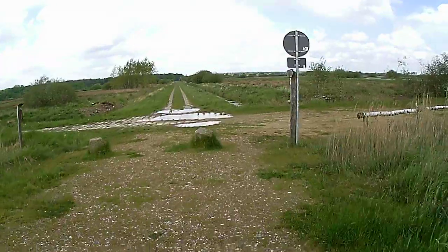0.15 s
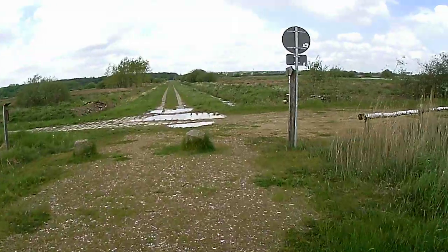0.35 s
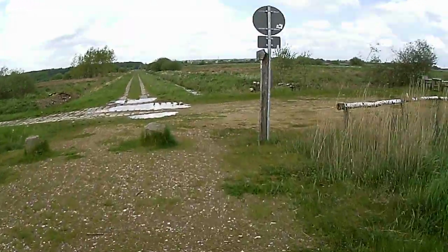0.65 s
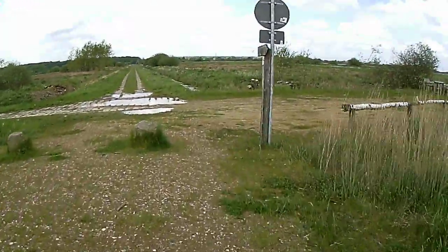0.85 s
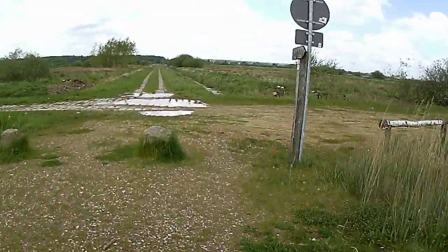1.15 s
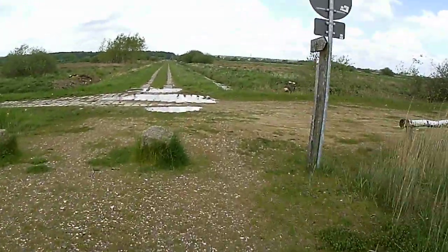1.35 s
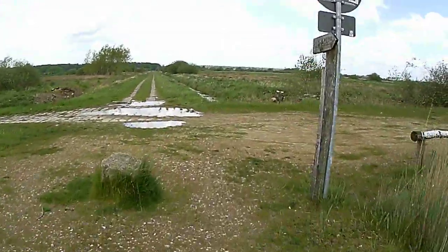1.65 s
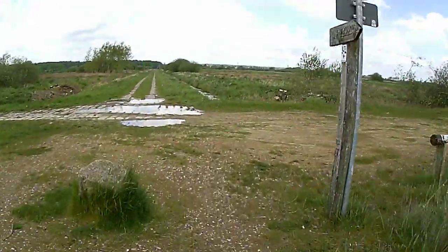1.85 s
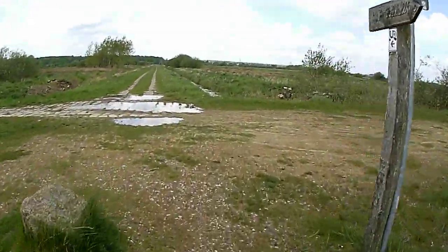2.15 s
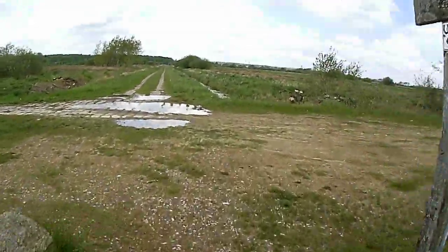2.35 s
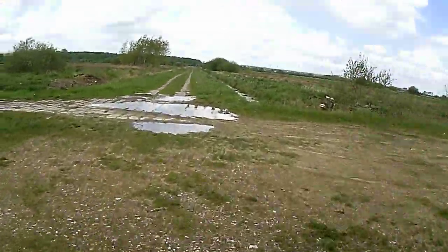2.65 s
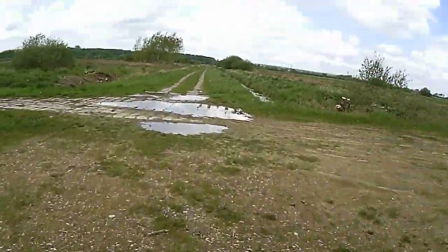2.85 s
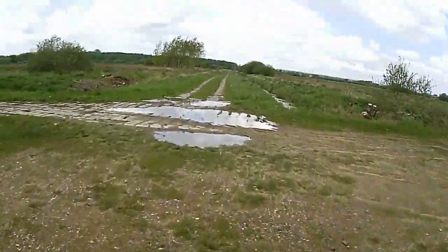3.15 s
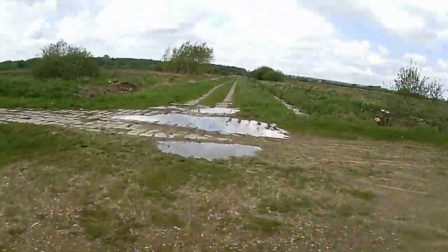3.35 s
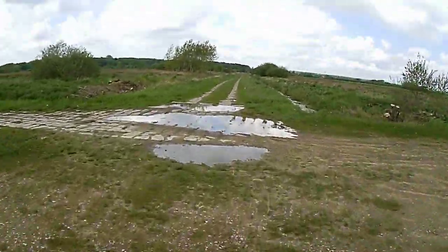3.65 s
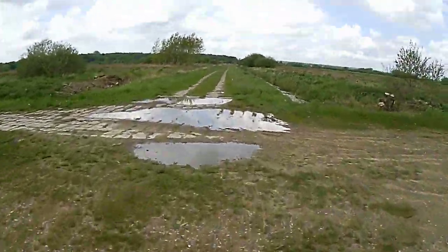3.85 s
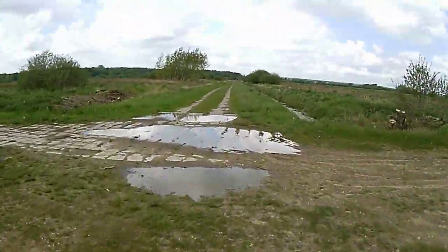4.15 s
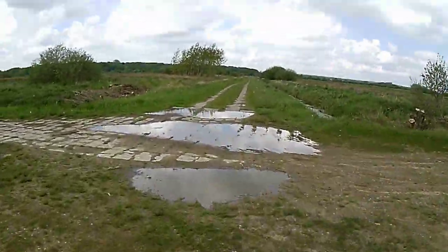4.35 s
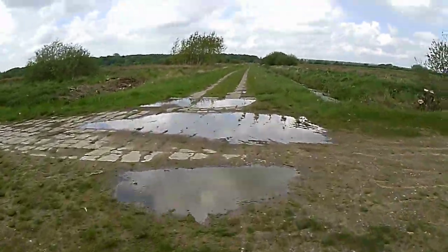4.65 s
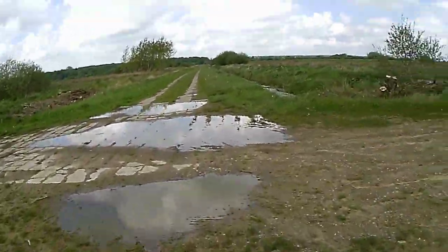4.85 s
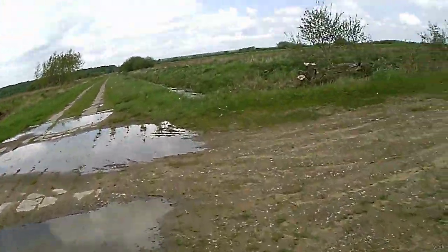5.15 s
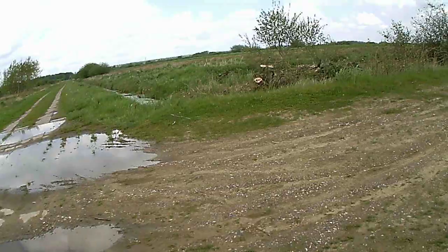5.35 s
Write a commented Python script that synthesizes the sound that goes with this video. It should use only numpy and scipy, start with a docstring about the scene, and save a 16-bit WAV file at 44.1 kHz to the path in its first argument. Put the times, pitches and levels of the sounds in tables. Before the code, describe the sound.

Close on a handlebar, gravel crunch and low mount rumble give way to stuttering brake squeals near 1 kHz, with plastic rattling and wind.

```python
"""A bicycle brake squeals near 1 kHz, close to a camera on the handlebar, as the bicycle rolls over gravel.
The sticking and slipping pad sings a wavering tone with overtones, in short grips from the start of the
braking, with one longer squeal near 2.5 s. Rough ground makes the camera mount boom at a low resonance, and
its loose case rattles in short modes. Tyres crunch as filtered grains, the freewheel ticks early on in bright
bursts of noise, and lumpy low noise is wind on the microphone, over the camera's own hiss and faint whine."""
import sys
import numpy as np
from scipy import signal
from scipy.fft import rfft, irfft, next_fast_len
from scipy.io import wavfile
from scipy.ndimage import uniform_filter1d

SR = 44100
rng = np.random.default_rng(int(sys.argv[2]) if len(sys.argv) > 2 else 0)


def output_pcm(signal):
    """Save a mono or channel-first signal as 16-bit PCM at the path in sys.argv[1].

    Samples are clipped to [-1, 1] before scaling.
    """
    pcm = np.clip(np.atleast_2d(signal).T, -1, 1) * 32767
    wavfile.write(sys.argv[1], SR, np.round(pcm).astype(np.int16))


N = 242991
T = np.arange(N) / SR  # seconds

# Rough ground under the bicycle, shaking the mount and making the case chatter.
# Each row: start in seconds, end in seconds, relative shake level in dB, relative chatter level in dB.
ROUGH_PATCHES = [(0.024, 0.109, -18, -40), (0.276, 0.352, -18, -42.5), (0.435, 0.472, -17, -46),
                 (0.565, 0.654, -22.5, -42), (0.698, 0.757, -16.5, -42), (0.847, 1.082, -21, -48),
                 (1.147, 1.3, -21.5, -58), (1.396, 1.481, -19.5, -56), (1.736, 1.82, -21.5, -16.5),
                 (2.019, 2.032, -18, -15), (2.152, 2.225, -21.5, -11), (2.227, 2.341, -19.5, -8.5),
                 (2.851, 2.985, -24.5, -17), (3.194, 3.289, -26, -23), (3.319, 3.479, -24.5, -15),
                 (3.591, 3.64, -21, -20.5), (3.73, 3.794, -20, -19), (3.819, 3.94, -22.5, -24.5),
                 (4.25, 4.268, -19, -11.5), (4.303, 4.403, -20.5, -20.5), (4.505, 4.543, -30, -25.5),
                 (4.669, 4.804, -25, -28.5), (4.854, 4.954, -20.5, -17.5), (5.04, 5.21, -26.5, -60),
                 (5.321, 5.407, -22, -21), (5.428, 5.473, -21, -30)]
SMOOTH_GROUND_DB, SHAKE_RISE_DB_PER_S, SHAKE_FALL_DB_PER_S = -29.5, 377, 299
# Rumble of the camera mount. Each row: frequency in Hz, relative spectrum level in dB per Hz.
MOUNT_RUMBLE = [(8.8, -38), (15, -11), (32, -5.5), (49, 5.5), (65, -25.5), (78, 6), (108, -3.5), (130, -23),
                (170, -56.5), (290, -120)]
# Higher resonances of the handlebar. Each row: centre in Hz, width in Hz, level against the shaking in dB.
HANDLEBAR_MODES = [(196.4, 19, -20.5), (293, 10, -28)]

# Tyres on gravel, before clumping. Each row: time in seconds, level in dB.
ROLL_LEVEL = [(0, -41), (.45, -47), (1.3, -40.5), (2.3, -33), (3.1, -50), (4, -43), (5.51, -48)]
# Colour of the gravel. Each row: frequency in Hz, relative spectrum level in dB per Hz.
GRAVEL_COLOUR = [(200, 5.5), (500, 11.5), (850, 9.5), (1300, 2), (1750, 6), (2200, -4.5), (3100, -0.5),
                 (3900, -16), (5000, -12.5), (7000, -17), (9000, -31.5), (16000, -19)]
# Single stones popping from under the tyre. Each row: time in seconds, relative level in dB, ring in Hz.
STONE_POPS = [(0.7735, -21.5, 1270), (0.836, -31, 1940), (0.8905, -30, 2090), (0.9035, -31, 1850),
              (0.975, -21.5, 1960), (0.992, -15.5, 1260), (1.1953, -21.5, 1580)]
# Bumps thudding through the frame. Each row: time in seconds, relative level in dB.
FRAME_BUMPS = [(0.549, -21.5), (0.773, -20), (0.989, -24), (1.193, -24)]

# Wind on the microphone. Each row: time in seconds, level in dB.
GUST_LEVEL = [(0, -51), (.75, -39.5), (1.5, -45), (2.3, -38.5), (3.2, -42), (3.55, -33.5), (3.8, -33.5),
              (3.95, -27.5), (4.14, -40), (4.6, -42.5), (4.95, -35.5), (5.08, -27.5), (5.2, -25),
              (5.35, -28.5), (5.51, -37.5)]
# Colour of wind and of bumps. Each row: frequency in Hz, relative spectrum level in dB per Hz.
LOW_COLOUR = [(60, -32.5), (135, 6), (200, 0.5), (280, 1.5), (420, -5.5), (700, -10), (1100, -19),
              (2000, -27), (5000, -57)]
# Faint thin whine in the treble. Each row: centre in Hz, width in Hz, level in dB.
WHINE_BANDS = [(8260, 150, -74.5), (9280, 140, -70.5)]

# Single knocks of the loose camera case, strong and light. Each row: time in seconds, peak in dB.
SINGLE_KNOCKS = [(1.485, -9), (1.518, -18), (1.59, -14), (1.684, -15), (1.768, -12), (1.784, -7),
                 (1.811, -12), (2.02, -15), (2.11, -13), (2.363, -11), (2.418, -10), (2.709, -8),
                 (2.862, -10), (2.927, -14), (3.412, -9), (3.47, -13), (3.774, -13), (3.874, -14),
                 (4.267, -6), (4.387, -9), (4.686, -19), (4.851, -11), (4.883, -10), (5.163, -23),
                 (5.325, -12), (5.388, -14)]
# Modes of the case, before scatter. Each row: frequency in Hz, relative level in dB, 60 dB decay in seconds.
CASE_MODES = [(420, -8.5, 0.0058), (1754, -8, 0.013), (2580, -12.5, 0.017), (3310, -1, 0.014),
              (3460, 9, 0.013), (4030, -9, 0.031), (4860, 6.5, 0.008), (5065, -1, 0.019),
              (5850, -7.5, 0.013), (6230, -6.5, 0.015), (7680, -5, 0.0093), (10200, -12.5, 0.0065),
              (12200, -22, .005)]
# Dry crack of a blow on the case. Each row: frequency in Hz, relative spectrum level in dB per Hz.
CRACK_COLOUR = [(300, 4), (800, 1.5), (2300, 9.5), (3500, 6), (8000, -7), (10000, -16), (16000, -19)]
SQUEAL_CHATTER_DB, FULL_GRIP_DB = -17.5, -6  # a squeal at full grip shakes the case too
CHATTER_RISE_DB_PER_S, CHATTER_FALL_DB_PER_S = 1798.5, 1102

# Freewheel pawl. Each row: time in seconds, relative level in dB.
PAWL_TICKS = [(0.1593, -23), (0.2658, -19.5), (0.5495, -21), (0.7845, -21), (0.818, -21.5), (0.854, -18.5),
              (0.9134, -22.5), (0.9999, -17.5), (1.0584, -24.5), (1.123, -27.5), (1.1475, -25), (1.19, -26),
              (1.266, -33.5)]
# Colour of a tick. Each row: frequency in Hz, relative spectrum level in dB per Hz.
PAWL_COLOUR = [(500, -3), (1500, 4.5), (3000, -6), (5000, -3.5), (7000, -1), (8300, -11), (9700, -0.5),
               (11000, -6.5), (12600, -4), (14000, -17), (16000, -9.5)]

# The pad dragging on the wheel. Each row: time in seconds, relative level in dB.
DRAG_LEVEL = [(1.1, -71), (1.3, -47.5), (1.8, -35), (2.8, -39), (3.2, -38.5), (4.6, -39.5), (5.1, -42.5),
              (5.51, -43)]
# Resonances that the dragging wakes. Each row: centre in Hz, width in Hz, relative level in dB.
WHEEL_MODES = [(985, 162, 7.5), (1670, 170, 0), (1932, 47, -4), (2465, 140, -5), (3144, 67, -9.5),
               (3100, 110, -25), (4500, 240, -24), (9400, 250, -24.5), (10600, 230, -29)]

# Faint song of the pad between grips. Each row: time in seconds, relative level in dB, pitch in Hz.
LIGHT_TOUCH = [(1.431, -44.5, 1130), (1.5, -21, 1116), (1.95, -22, 1095), (2.3, -26, 1067),
               (2.8, -30.5, 1043), (3.1, -23, 1055), (3.73, -37.5, 1045), (4.0, -30.5, 1045),
               (4.38, -34, 1045), (4.87, -26.5, 1050), (5.0, -37.5, 1060), (5.25, -45, 1055)]
# One squeal for each grip of the pad.
# Each row: start in seconds, end in seconds, relative level in dB, swell over its length in dB, pitch in Hz.
SQUEAL_GRIPS = [(1.467, 1.482, -3.5, -4.5, 1022), (1.535, 1.561, -11.5, -2, 1103),
                (1.574, 1.648, -4.5, -1, 1006), (1.677, 1.695, -10.5, -0.5, 1053),
                (1.713, 1.728, -9, -0.5, 1018), (1.751, 1.768, -8.5, -3.5, 1067),
                (1.794, 1.924, -5, 2, 1000), (1.998, 2, -12, 0.5, 1080), (2.036, 2.111, -5.5, 2, 1002),
                (2.147, 2.205, -8, -4, 1003), (2.346, 2.717, -6, 1.5, 994.4),
                (2.854, 3.032, -7.5, -2, 992.5), (3.204, 3.247, -8, -2.5, 1003),
                (3.262, 3.423, -14.5, 7.5, 1008), (3.468, 3.557, -15.5, 8.5, 1029),
                (3.609, 3.629, -13, -1, 1018), (3.825, 3.885, -7, 0.5, 1013), (3.904, 3.936, -17, 2, 999),
                (4.031, 4.045, -13, -14.5, 1026), (4.105, 4.11, -14, 0, 1046),
                (4.139, 4.195, -5, -12, 1016), (4.435, 4.49, -7, -4, 1019),
                (4.521, 4.572, -10.5, -10.5, 1033), (4.743, 4.799, -6.5, -5.5, 1012),
                (5.023, 5.035, -21, -2, 1071), (5.114, 5.168, -24.5, 7.5, 1039)]
ATTACK_DB_PER_S, RELEASE_DB_PER_S = 1400.5, 559.5
SLACK_HZ = 55.27  # the pitch rises towards this much higher while the pad takes hold or lets go
# Judders of the pad: the pitch shifts and a lower mode grows.
# Each row: centre in seconds, half length in seconds, added share of the lower mode, downward shift in Hz.
PAD_JUDDERS = [(1.646, 0.033, 0.16, 12), (1.914, 0.02, .51, 70.5), (2.084, 0.016, 0.098, 65.5),
               (2.434, 0.038, 0.1, -1.5), (2.568, 0.065, 0.044, 0.5), (2.739, 0.031, 0.52, 28)]
# Overtones of the squeal. Each row: multiple of the pitch, relative level at full grip in dB.
SQUEAL_OVERTONES = [(2, -19.5), (3, -22.5), (4, -34.5), (5, -34), (6, -42), (7, -48)]
# Hiss of the rubbing pad. Each row: frequency in Hz, relative spectrum level in dB per Hz.
RUB_COLOUR = [(200, -42.5), (600, -4), (1400, -37), (2500, -7), (3450, 18.5), (4300, 14.5), (5100, 19.5),
              (5500, -12.5), (7800, -0.5), (11000, -5.5), (16000, -23)]


def amp(db):
    """Decibels to gain."""
    return 10 ** (np.asarray(db) / 20)


def evened(x):
    """Scales to an rms of one."""
    return x / np.sqrt(np.mean(abs(x) ** 2) + 1e-20)


def curve(rows):
    """Joins (seconds, value) rows by straight lines."""
    s, value = np.transpose(rows)
    return np.interp(T, s, value)


def colour(x, points):
    """Shapes the spectrum of x by (Hz, dB) points, at an rms of one."""
    hz, db = np.transpose(points)
    f = np.fft.rfftfreq(len(x), 1 / SR)
    gain = amp(np.interp(np.log(f + 1), np.log(hz), db))
    return evened(irfft(rfft(x) * gain, len(x)))


def noise():
    """White noise."""
    return rng.standard_normal(N)


def drift(rate_hz):
    """Smooth chance, at an rms of one, that changes up to about this rate."""
    size = next_fast_len(N)
    f = np.fft.rfftfreq(size, 1 / SR)
    slow = rfft(noise(), size) * np.exp(-(f / rate_hz) ** 2)
    return evened(irfft(slow, size)[:N])


def bands(rows):
    """Noise in narrow resonances: (centre Hz, width Hz, rms dB)."""
    f = np.fft.rfftfreq(N, 1 / SR)
    power = 0
    for hz, width, db in rows:
        shape = 1 / (1 + ((f - hz) / width) ** 2) ** 2
        power = power + amp(2 * db) * SR / (np.pi * width) * shape
    return irfft(rfft(noise()) * np.sqrt(power), N)


def add(mix, s, sound):
    """Mixes a short sound in at time s."""
    part = mix[max(round(s * SR), 0):][:len(sound)]
    part += sound[:len(part)]


def edges(start, end, rise_db_per_s, fall_db_per_s):
    """Attack, hold and release, as dB relative to the held level."""
    before, after = np.maximum(start - T, 0), np.maximum(T - end, 0)
    return -abs(rise_db_per_s) * before - abs(fall_db_per_s) * after


def thump(t, peak_s):
    """Envelope of a light blow: it reaches one at peak_s, then dies away."""
    return t / peak_s * np.exp(1 - t / peak_s)


def shaking(uneven_db=1.85):
    """Level (dB) of the mount's shaking: it builds to each rough patch and rings down after it."""
    level_db = np.full(N, SMOOTH_GROUND_DB)
    for start, end, db, _ in ROUGH_PATCHES:
        patch_db = db + edges(start, end, SHAKE_RISE_DB_PER_S, SHAKE_FALL_DB_PER_S)
        level_db = np.maximum(level_db, patch_db)
    return level_db + uneven_db * drift(31)


def mount(shake_db, ring_hz=67, wander_hz=4, ring_db=-1, rumble_db=-8):
    """The camera sways on its mount at one low resonance, over a rumble; also returns the sway phase."""
    sway = 2 * np.pi * np.cumsum(ring_hz + wander_hz * drift(18)) / SR
    ring = amp(ring_db + shake_db) * np.sqrt(2) * np.sin(sway)
    rumble = colour(noise(), MOUNT_RUMBLE) * amp(rumble_db) + bands(HANDLEBAR_MODES)
    smoothed_db = uniform_filter1d(shake_db, SR // 3)  # the rumble follows the shaking slowly
    return ring + amp(smoothed_db) * rumble, sway


def tyres(grains_per_s=1300, grain_db=4.5, clump_db=2, stone_db=-2, stone_s=0.0028, bump_db=-9, bump_s=0.0088):
    """Countless small stones grind under the tyres; a few pop out or jolt the frame."""
    struck = rng.random(N) < grains_per_s / SR
    size_db = grain_db * np.minimum(rng.exponential(1, N), 4)
    grains = struck * noise() * amp(size_db)
    out = amp(curve(ROLL_LEVEL) + clump_db * drift(6.7)) * colour(grains, GRAVEL_COLOUR)
    t = np.arange(2048) / SR
    for s, db, hz in STONE_POPS:
        grit = colour(rng.standard_normal(len(t)), GRAVEL_COLOUR)
        pop = 0.3 * np.sin(2 * np.pi * hz * t) + 0.47 * grit
        add(out, s, amp(db + stone_db) * thump(t, stone_s) * pop)
    for s, db in FRAME_BUMPS:
        thud = colour(rng.standard_normal(len(t)), LOW_COLOUR)
        add(out, s, amp(db + bump_db) * thump(t, bump_s) * thud)
    return out


def wind(lumps_db=1):
    """Lumpy low turbulence at the microphone port."""
    turbulence = noise() * amp(lumps_db * drift(53))
    return amp(curve(GUST_LEVEL)) * colour(turbulence, LOW_COLOUR)


def camera(hiss_db=-61):
    """Hiss of the electronics behind the microphone, with a faint whine."""
    hiss_colour = [(1000, 23.5), (5000, -5), (8000, 8.5), (12000, -14.5), (16000, -5.5)]  # (Hz, dB per Hz)
    return bands(WHINE_BANDS) + amp(hiss_db) * colour(noise(), hiss_colour)


def case_knock(treble_db, crack_db=-7, crack_s=0.002, scatter_db=3):
    """One blow on the plastic case, peak one: a crack and its short modes."""
    t = np.arange(1024) / SR
    hz, db, t60 = np.transpose(CASE_MODES)[:, :, None]
    chance = rng.standard_normal((3, len(CASE_MODES), 1))  # for level, pitch and phase of each mode
    tilt = np.clip(2 * np.log2(hz / 3500), 0, 1)  # full from half an octave above 3500 Hz
    db = db + scatter_db * chance[0] + treble_db * tilt
    cycles = np.sin(2 * np.pi * hz * (1 + 0.026 * chance[1]) * t + chance[2])
    ring = (amp(db - 60 * t / t60) * cycles).sum(0)
    crack = colour(rng.standard_normal(len(t)), CRACK_COLOUR) * np.exp(-t / crack_s)
    onset = 1 - np.exp(-t / 0.000052)
    blow = (ring + amp(crack_db) * crack) * onset
    return blow / abs(blow).max()


def rattle(sway, squeal_db, chatter_db=-1, spread_db=5.5, back_db=-3.0, forth_treble_db=-5.5,
           back_treble_db=5, follow=2.2, clump_db=2):
    """The loose case strikes twice in each sway: hard one way, lighter and brighter on the way back."""
    out = np.zeros(N)
    for s, db in SINGLE_KNOCKS:
        add(out, s, amp(db) * case_knock(2 * rng.standard_normal()))
    # the squeal or the ground drives the chatter, whichever shakes harder
    force_db = SQUEAL_CHATTER_DB + follow * np.minimum(squeal_db - FULL_GRIP_DB, 0)
    for start, end, _, db in ROUGH_PATCHES:
        patch_db = db + edges(start, end, CHATTER_RISE_DB_PER_S, CHATTER_FALL_DB_PER_S)
        force_db = np.maximum(force_db, patch_db)
    force_db = force_db + clump_db * np.minimum(drift(25), 1)
    single_s = np.array(SINGLE_KNOCKS)[:, 0]
    turns = np.floor(sway / np.pi + 0.14 * drift(90))  # half sways, raggedly timed
    for i in np.flatnonzero(np.diff(turns) > 0):
        if abs(single_s - T[i]).min() <= .005:
            continue  # a single knock takes the place of the chatter
        back = turns[i] % 2
        size_db = force_db[i] + back * back_db + spread_db * min(rng.standard_normal(), 1)
        add(out, T[i], amp(size_db + chatter_db) * case_knock(back * back_treble_db + forth_treble_db))
    return out


def freewheel(tick_db=4, ring_s=0.0014, tail=0.039, tail_s=0.01, peak_to_rms=2.13):
    """The pawl drops into its teeth: bright, dry ticks."""
    out, t = np.zeros(N), np.arange(1024) / SR
    decay = np.exp(-t / ring_s) + tail * np.exp(-t / tail_s)
    tick_rms = np.sqrt(np.mean(decay ** 2)) / peak_to_rms
    for s, db in PAWL_TICKS:
        tick = colour(rng.standard_normal(len(t)), PAWL_COLOUR) * decay
        add(out, s, amp(db + tick_db) * evened(tick) * tick_rms)
    return out


def drag(drag_db=-4, uneven_db=3.5):
    """The soft scrape of the pad wakes resonances, heard between squeals."""
    return amp(curve(DRAG_LEVEL) + drag_db + uneven_db * drift(20)) * bands(WHEEL_MODES)


def judder_shape(s, half):
    """Smooth rise and fall of one judder, peak one at time s."""
    return np.exp(-((T - s) / half) ** 2)


def pad():
    """Level (dB) and pitch (Hz) of the squeal: power-weighted over the light touch and every grip."""
    times, touch_db, touch_hz = np.transpose(LIGHT_TOUCH)
    power = amp(2 * np.interp(T, times, touch_db))
    weighted_hz = power * np.interp(T, times, touch_hz)
    for start, end, db, swell_db, hz in SQUEAL_GRIPS:
        hold = amp(np.maximum(edges(start, end, ATTACK_DB_PER_S, RELEASE_DB_PER_S), -100))
        swell = np.interp(T, [start, end], [0, 1])
        share = (hold * amp(db + swell_db * swell)) ** 2
        power = power + share
        weighted_hz = weighted_hz + share * (hz + SLACK_HZ * (1 - hold))
    sag_hz = sum(sag * judder_shape(s, half) for s, half, _, sag in PAD_JUDDERS)
    return 10 * np.log10(power), weighted_hz / power - sag_hz


def brake(sway, level_db, pitch_hz, flutter_db=2.39, loose_flutter_db=2.0, flutter_hz=70, waver_hz=7,
          fuzz=0.057, lower_ratio=.845, lower_share=0.023, steep=0.14, judder_bite=10.4, rub_db=-31,
          rub_steep=0.35, crackle_db=2.0, smear=0.33, flicker_db=2, sum_tone_db=-2):
    """Stick and slip of the pad: a wavering tone whose overtones grow with the grip."""
    sounding = np.interp(T, [1.43, 1.445, 5.2, 5.3], [0, 1, 1, 0])
    grip = np.clip(amp(level_db + 5.5), 0, 1.1)
    loose = np.clip(1 - grip, 0, 1)
    # a lightly touching pad flutters and wavers more
    flutter = (flutter_db + loose_flutter_db * loose) * drift(flutter_hz)
    level = sounding * amp(level_db + flutter)
    waver = waver_hz * (1 + loose) * drift(71.6)
    phase = 2 * np.pi * np.cumsum(pitch_hz + waver) / SR
    judder = sum(share * judder_shape(s, half) for s, half, share, _ in PAD_JUDDERS)
    lower = (lower_share + judder) * np.exp(1j * (lower_ratio * phase + 0.53 * drift(52)))
    upper = np.exp(1j * phase) + fuzz * (drift(130) + 1j * drift(180))
    # both modes mix in the friction: a sum tone, and side tones on every overtone
    mixed = (upper + lower) / (1 + judder) ** 1.05
    overtones = amp(sum_tone_db) * grip * (upper * lower).real
    for multiple, db in SQUEAL_OVERTONES:
        # higher overtones need a firmer grip and are more ragged
        smeared = np.exp(1j * smear * (multiple - 1) * drift(96))
        ragged = amp(db + flicker_db * drift(88)) * smeared
        firmness = (1 + judder_bite * judder) * grip ** (steep * (2 * multiple - 3))
        overtones = overtones + firmness * (ragged * mixed ** multiple).imag
    # grit under the pad crackles, most where the mount's boom crosses zero, twice in each sway
    crackle = crackle_db * np.clip(drift(400), -2, 2) + 1.2 * np.cos(2 * sway)
    grit = noise() * (1 + 0.17 * np.cos(phase)) * amp(crackle)
    rub = amp(rub_db) * grip ** rub_steep * colour(grit, RUB_COLOUR)
    return level * ((upper + lower).real + overtones + rub)


def scene():
    """Everything as it reaches the microphone on the handlebar."""
    boom, sway = mount(shaking())
    squeal_db, squeal_hz = pad()
    ground = boom + tyres() + rattle(sway, squeal_db)
    wheel = freewheel() + drag() + brake(sway, squeal_db, squeal_hz)
    return (ground + wind() + camera() + wheel)[None]


def record(dry, top=0.63, bottom=0.56, knee=8, low_hz=22, high_hz=15700):
    """The microphone rounds off the loudest peaks, sooner on one side; then come the band limits."""
    ceiling = np.where(dry > 0, top, bottom)
    rounded = dry / (1 + abs(dry / ceiling) ** knee) ** (1 / knee)
    low_cut = signal.butter(2, low_hz, "highpass", fs=SR, output="sos")
    passed = signal.sosfilt(low_cut, rounded)
    high_cut = signal.firwin(255, high_hz, window=("kaiser", 8), fs=SR)
    return signal.oaconvolve(passed, high_cut[None], "same")


dry = scene()
out = record(dry)
output_pcm(out)
```